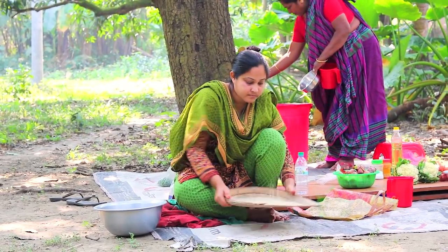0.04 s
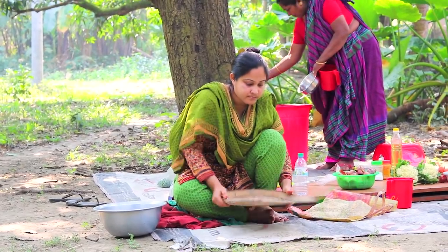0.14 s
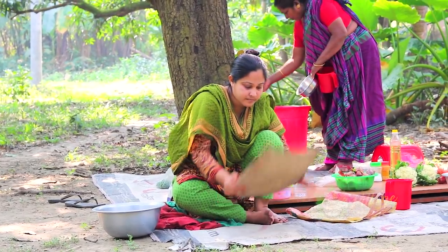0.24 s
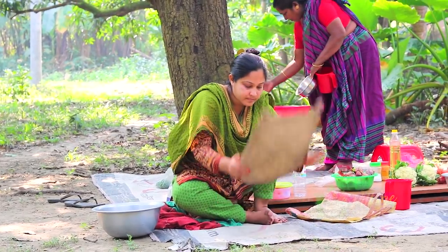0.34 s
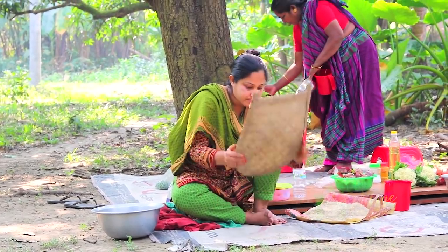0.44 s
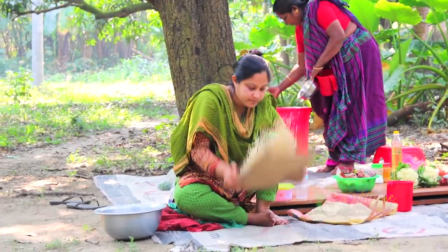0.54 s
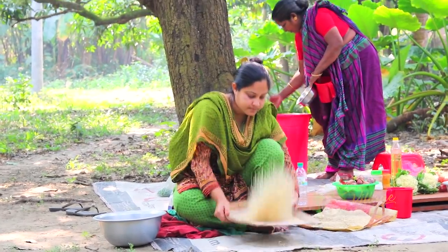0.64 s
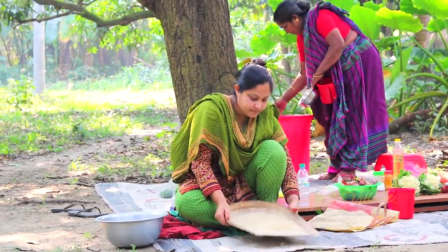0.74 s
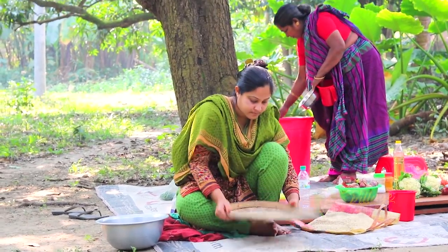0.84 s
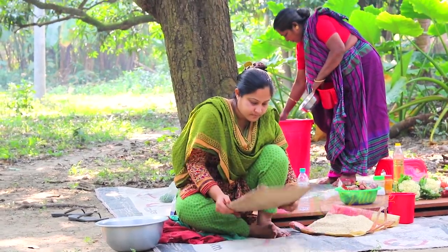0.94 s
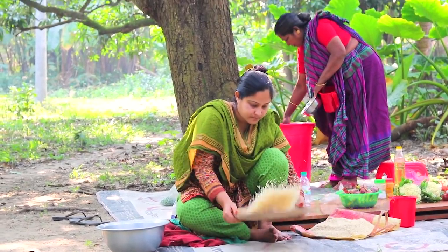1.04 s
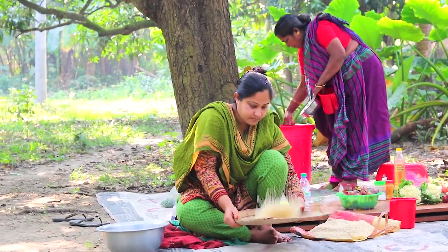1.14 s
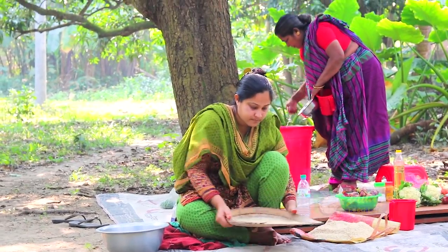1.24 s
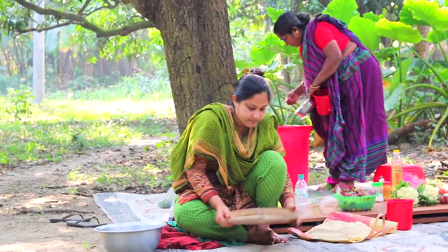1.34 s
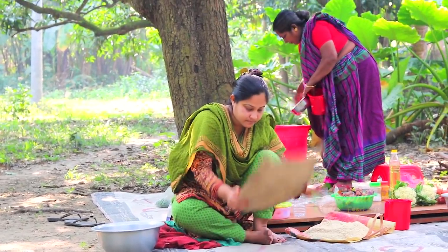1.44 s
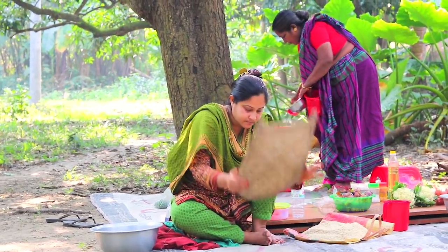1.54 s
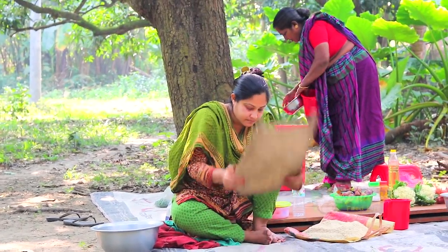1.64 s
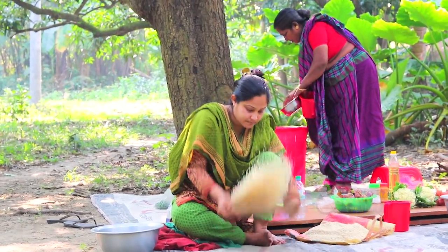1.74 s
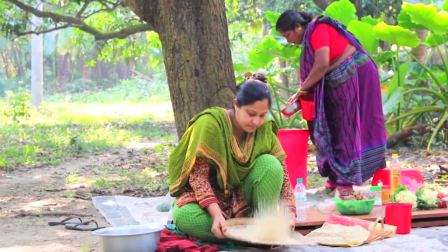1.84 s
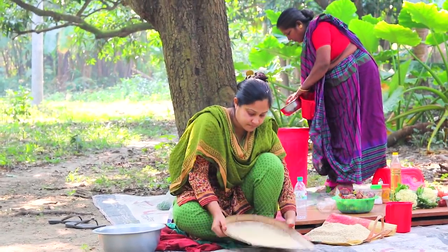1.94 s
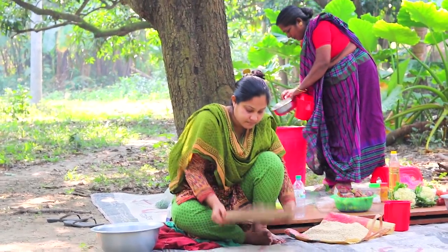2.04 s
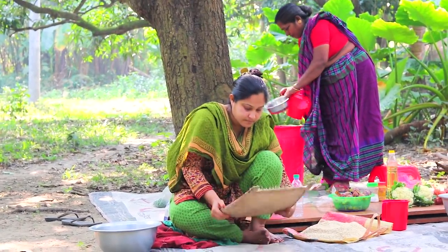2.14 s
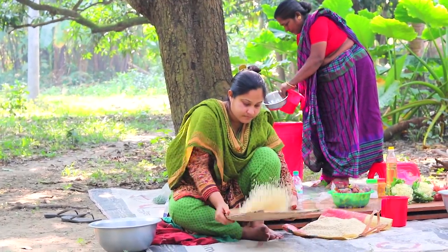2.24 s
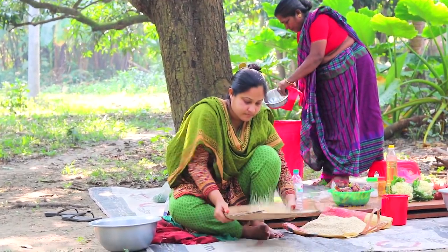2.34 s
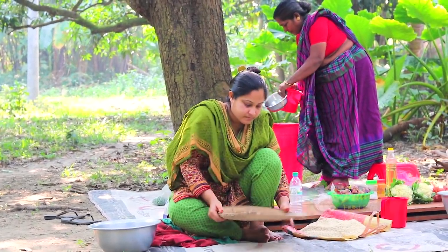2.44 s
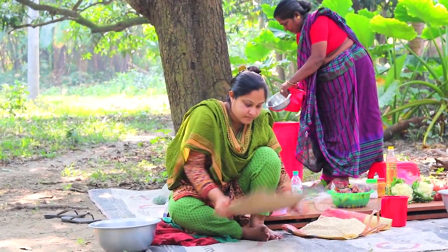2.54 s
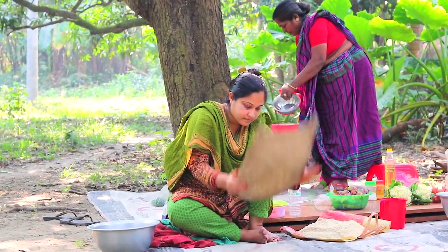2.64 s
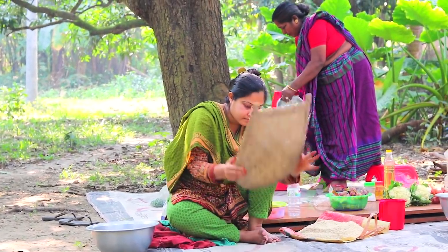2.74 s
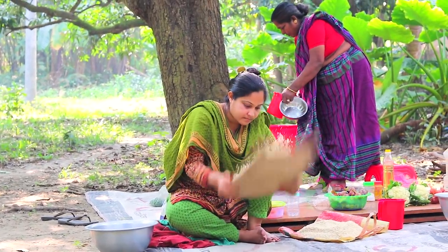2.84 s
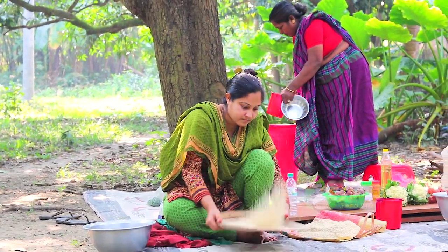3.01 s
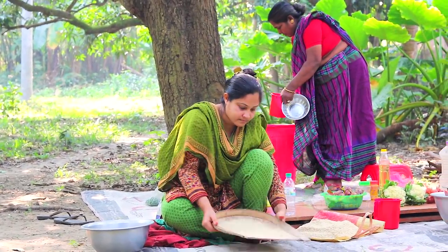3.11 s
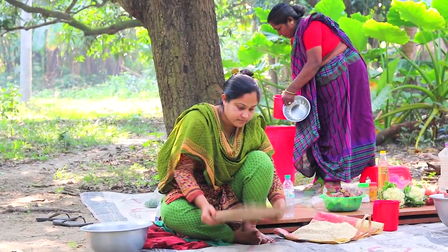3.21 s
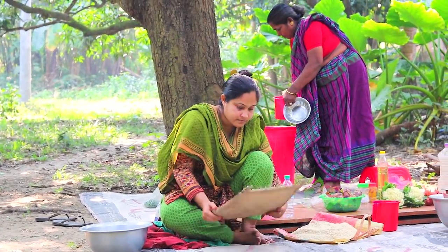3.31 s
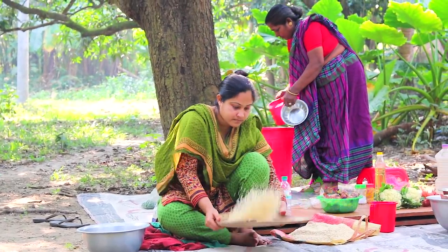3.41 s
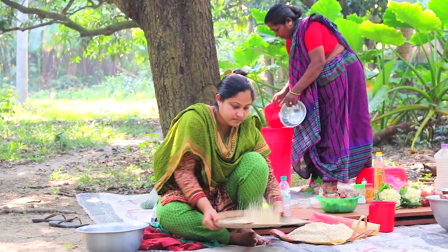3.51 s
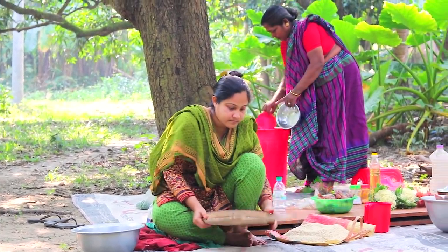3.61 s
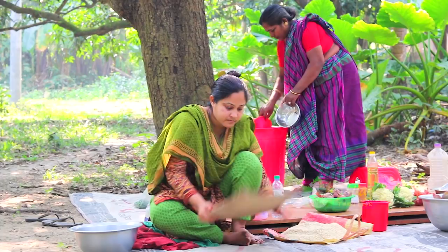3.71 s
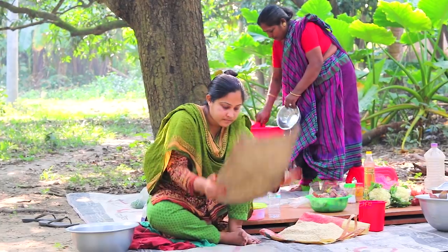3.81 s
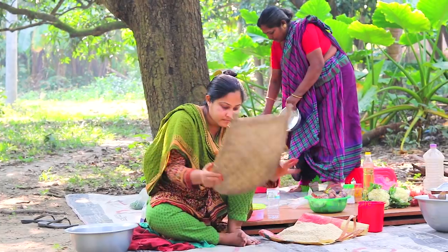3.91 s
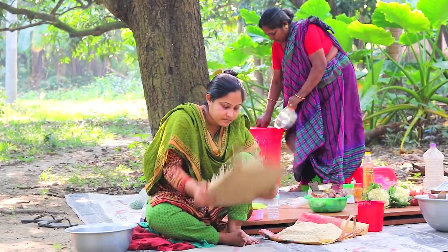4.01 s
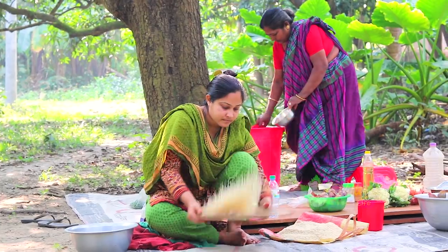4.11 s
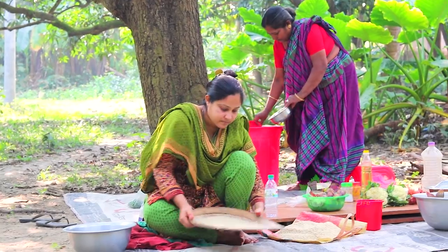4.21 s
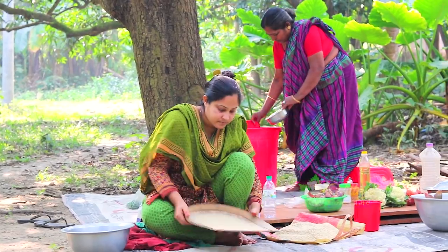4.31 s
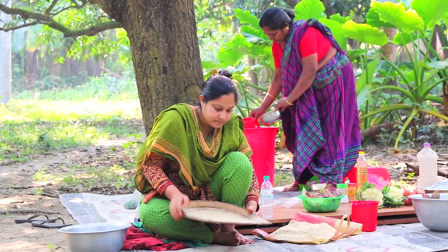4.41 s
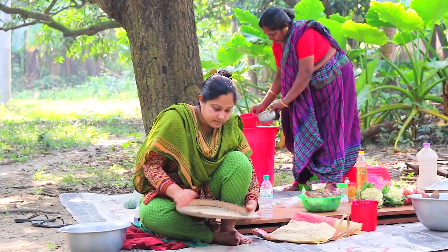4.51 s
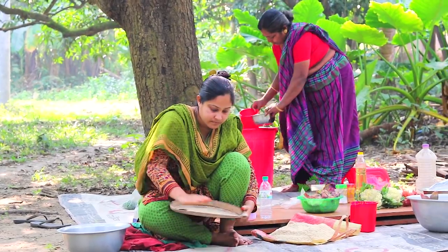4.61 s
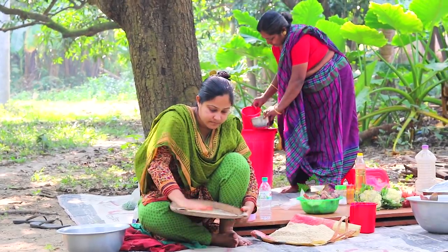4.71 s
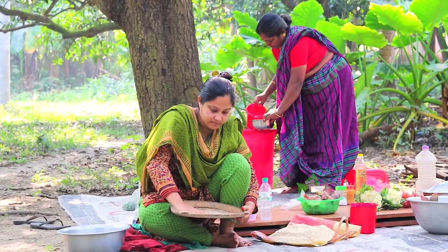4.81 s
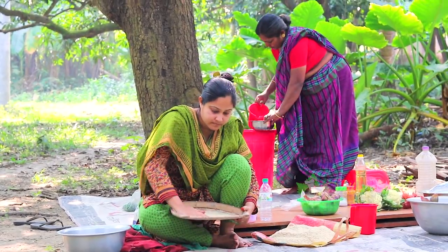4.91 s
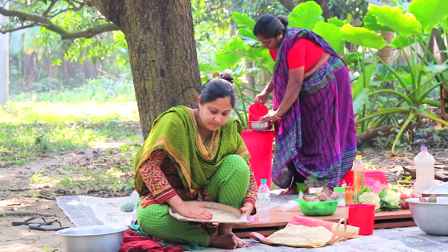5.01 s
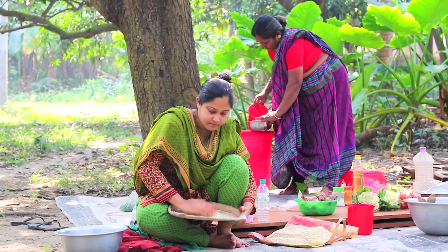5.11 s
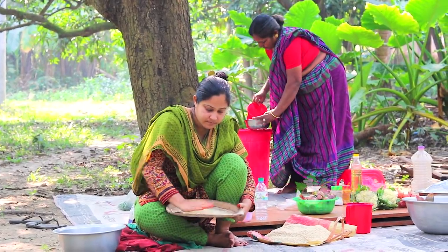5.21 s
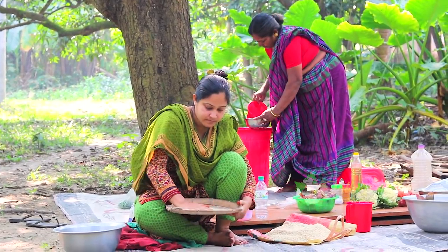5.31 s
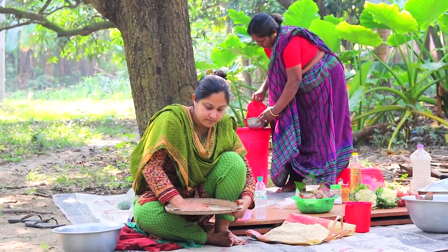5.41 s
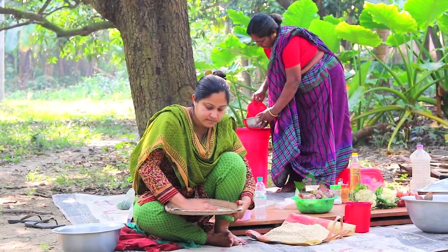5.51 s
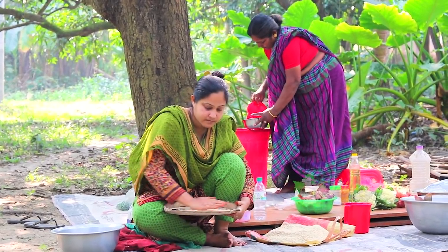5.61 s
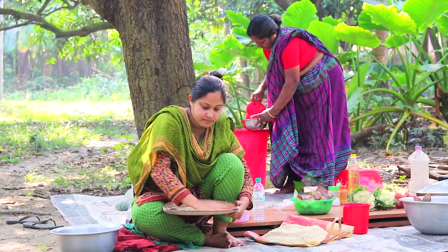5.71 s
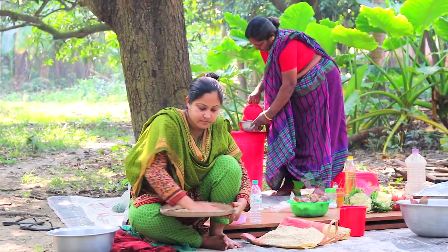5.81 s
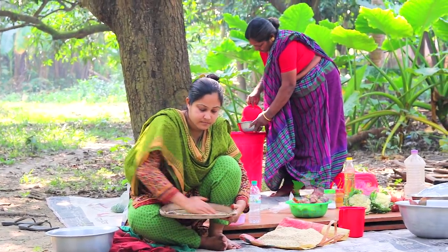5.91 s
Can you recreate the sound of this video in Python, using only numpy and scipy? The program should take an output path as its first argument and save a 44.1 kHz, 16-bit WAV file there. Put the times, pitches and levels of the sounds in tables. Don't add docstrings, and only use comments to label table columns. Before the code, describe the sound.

Grain is tossed and slid on a woven tray in rhythmic hissing strokes, with finger drum-taps, then a light hand-spread and a metal clink outdoors.

```python
import sys
import numpy as np
from scipy import signal
from scipy.fft import rfft, irfft, next_fast_len
from scipy.io import wavfile
from scipy.ndimage import uniform_filter1d

SR = 44100
rng = np.random.default_rng(int(sys.argv[2]) if len(sys.argv) > 2 else 0)


def wav_record(signal):
    frames = np.transpose(np.atleast_2d(signal))
    bounded = np.clip(frames, -1, 1)
    quanta = np.round(bounded * 32767).astype(np.int16)
    wavfile.write(sys.argv[1], SR, quanta)


def convert_level_to_amplitude(level_db):
    exponent = np.asarray(level_db, float) / 20
    return 10 ** exponent


N = 262395

# [pitch_hz, level_db per Hz]
YARD_COLOUR = [(15, -40), (25, -3), (105, -0.5), (285, -3), (451, -7), (516, -9), (796, -12.5), (962, -9),
               (1520, -17.5), (1890, -14.5), (2550, -16), (3430, -14.5), (4030, -16), (6920, -22),
               (16000, -35)]
# [pitch_hz, likeness 0-1]
YARD_LIKENESS = [(60, 0.97), (130, 0.91), (300, 0.87), (700, 0.37), (2000, 0.046), (8000, 0.043),
                 (15000, 0.18)]
# [pitch_hz, level_db, t60_s]
DRONE = [(79.5, -57.5, 0.35), (128, -59, 0.15)]
# [time_s, firings_per_s]
PUMP_SPEED = [(0, 8.074), (.8, 8.171), (2, 8.243), (3.1, 8.017), (4.3, 8.19), (4.6, 8.522), (5.95, 8.584)]
# [time_s, peak_db]
PUMP_REACH = [(0, -37), (.29, -33), (.4, -52), (.65, -42), (.9, -60), (1.14, -51), (1.26, -44), (1.65, -29),
              (2.1, -33.5), (2.4, -29), (3.35, -28.5), (3.85, -30.5), (4.45, -28), (4.7, -32.5),
              (4.93, -28), (5.4, -32), (5.6, -33), (5.95, -31)]
# [pitch_hz, level_db, t60_s]
EXHAUST_MODES = [(211, -4.5, 0.031), (519, -5, 0.11)]
# [start_s, length_s, buzz_db, lower_buzz_db, share of the higher wing tone 0-1]
INSECT_BURSTS = [(.592, .026, -52, -62, .8), (1.613, .02, -53, -60, .9), (1.636, .028, -56, -58, .9),
                 (1.668, .042, -49.5, -55, .15), (1.722, .03, -51, -60, .6), (1.758, .038, -50, -60, .8),
                 (1.8, .022, -52, -58, .6)]
# [pitch_hz, t60_s]
WING_TONES = [
    [(7700, .012)],
    [(8100, .012)],
    [(4200, .004), (4500, .004)],
]
# [start_s, length_s, level_db, pitch_hz]
DOVE_COOS = [(.85, 0.22, -57, 775), (2.712, 0.083, -61, 760), (2.805, 0.075, -54, 752),
             (3.75, 0.15, -55, 777), (4.303, .075, -60, 775), (4.405, 0.22, -59, 776),
             (5.116, 0.3, -55.5, 775), (5.41, 0.29, -59.5, 778)]
# [start_s, level_db, pitch_hz]
BIRD_CHIPS = [(4.488, -58, 4160), (4.524, -55, 4000), (4.561, -54, 4000), (4.632, -63, 4070),
              (4.685, -64, 4000), (4.742, -55, 4100), (5.412, -60, 4100), (5.651, -50, 4010),
              (5.717, -49, 4110)]
# [delay_s, level_db]
ECHOES = [(.011, -40), (.023, -16.5), (.038, -25), (.061, -26)]
# [time_s, level_db]
CUP_HITS = [
    (4.7884, -34.5),
    (4.806, -48),
    (4.848, -50),
    (4.905, -52),
]
# [pitch_hz, level_db, t60_s]
CUP_MODES = [(676, -12, .2), (852, -6, .22), (905, -9, .12), (1082, -11, .15), (1132, -11, .15),
             (2600, -9, .45), (2691, -15, .2), (2877, 4, .2), (3129, -1, .1), (3586, -12, .35),
             (3633, -18, .3), (3926, -10, .3), (3977, -10, .25), (6062, -16, .3)]
# [pitch_hz, level_db, t60_s]
CUP_HUM = (943, -39, 1.1)
# [pitch_hz, width_hz, level_db, t60_s]
CUP_CHATTER = [(402, 170, 3, 0.15), (750, 440, -3, 0.4), (954, 250, -1, 0.34), (1810, 550, 2, .05),
               (2750, 500, -4, 0.39), (3830, 860, -8, 0.42), (7200, 3400, -6, 0.46)]
# [time_s, peak_db, pitch_hz, t60_s]
STRAY_TICKS = [(.49, -35, 6500, .004), (.5574, -28, 5800, .005), (.5695, -30, 4800, .004),
                   (.5722, -22, 3100, .005), (.5725, -22, 870, .015), (.5735, -23, 1900, .006),
                   (.5755, -23, 1400, .007), (.584, -32, 1500, .008), (.586, -35, 3300, .008),
                   (.649, -29, 7550, .002), (.664, -33, 4000, .004), (1.602, -36, 4400, .012),
                   (1.62, -36, 4350, .012), (1.639, -42, 2800, .008), (1.66, -42, 2700, .008),
                   (1.681, -42, 4500, .01), (1.7226, -36, 8900, .007), (1.7226, -38, 6100, .007),
                   (1.734, -38, 3300, .005), (1.7476, -36, 5900, .008), (1.7476, -36, 8900, .008),
                   (1.8275, -36, 9200, .005), (1.8275, -40, 6200, .004), (2.913, -36, 2900, .004),
                   (2.961, -40, 5500, .003), (2.9875, -38, 7000, .002), (2.999, -36, 3800, .006),
                   (3.0175, -32, 5500, .002), (4.0475, -30, 2950, .007), (4.058, -31, 3400, .006),
                   (4.146, -35, 2200, .008),
                   (4.4566, -38, 1550, .014), (4.4568, -40, 2300, .01), (4.464, -39, 1550, .011),
               (4.5975, -43, 3900, .01), (4.6, -38, 6000, .002), (4.7883, -32, 1900, .004),
               (4.7885, -36, 6100, .006), (5.178, -38, 5500, .002), (5.198, -41, 6000, .002),
               (5.2108, -36, 9000, .002), (5.237, -38, 12000, .002), (5.285, -42, 7500, .002),
               (5.345, -42, 6500, .002), (5.377, -44, 5000, .002), (5.4368, -40, 6000, .002),
               (5.527, -44, 3400, .07), (5.545, -37, 3700, .05), (5.555, -40.5, 1900, .13),
               (5.688, -35, 7800, .002), (5.79, -41.5, 2530, .065), (5.792, -36, 11000, .0015),
               (5.806, -35, 8500, .002), (5.81, -38, 5000, .003), (5.8364, -36, 6000, .002),
               (5.93, -38, 410, .11)]
FINGER_TIMES = [.5572, .569, .582, 1.7224, 1.7338, 1.7472, 2.8757, 2.8874, 2.9008, 4.0455, 4.0566, 4.066]
# [boom_db, tray_pitch_hz, nail_tick_db, nail_pitch_hz]
FINGER_TOUCHES = [(-13.5, 460, -25, 2870), (-12, 405, -25, 3300), (-23, 400, -36, 2500),
                  (-16.5, 430, -32, 2830), (-19, 390, -44, 2860), (-16, 370, -29.5, 2910),
                  (-16.5, 460, -26, 2700), (-17.5, 400, -24.5, 2420), (-21, 350, -27.5, 2820),
                  (-15.5, 430, -30.5, 3560), (-14.5, 350, -29, 2700), (-28, 440, -45, 2740)]
# [pitch_hz, level_db, t60_s]
TRAY_MODES = [(168, -16, 0.091), (238, -15, 0.06), (335, -43, 0.015), (394, -24, 0.031), (465, -21, 0.024),
              (740, -16, 0.037), (883, -10, 0.032)]
# [times the nail pitch, level_db, t60_s]
NAIL_MODES = [(.6, 0.5, 0.005), (1.0, 9, 0.0075), (1.3, 2, 0.004), (2.1, 2, 0.007), (3.1, 2, 0.006),
              (4.2, -1, 0.003)]
# [pitch_hz, level_db per Hz]
GRAIN_COLOUR = [(240, -45), (400, -16), (460, -12.5), (626, -16.5), (979, -11), (1230, -15.5), (1580, -9.5),
                (1990, -11), (2320, -7.5), (3200, -5.5), (4800, -7), (5300, -6), (5900, -4.5), (7870, -3.5),
                (10100, -8.5), (11900, -5.5), (16000, -12.5)]
GRAIN_ZONES = [350, 1800, 5500, 10000, 16000]
# [pitch_hz, likeness 0-1]
GRAIN_LIKENESS = [(500, 1), (1400, 0.92), (2700, 0.67), (3400, 0.8), (4700, 0.52), (6000, 0.89),
                  (7400, 0.33), (9000, 1), (10000, 0.26), (11500, 0.79), (14500, .5), (16000, .6)]
# [crest_s, rattle_db, hold_s, brightness_db, weight_db on the tray body]
CATCHES = [
    (.728, -24.5, 0.057, -1.8, -1),
    (1.906, -24, 0.045, -0.7, -2.4),
    (3.077, -22, 0.032, -1.5, -2.5),
    (4.218, -22.5, 0.015, -2.5, -3),
]
SLIDES = [(0.05, -28, 0.075, .6, 0.14), (1.193, -29.5, 0.084, -.6, .1), (2.37, -27.5, 0.062, -0.096, 0.085),
          (3.527, -28.5, 0.076, .2, 0.083)]
RETURNS = [(.238, -31, 0.061, -1.7, 1.6), (1.405, -31.5, 0.044, -0.24, .1), (2.578, -32, 0.045, 0.26, .1),
           (3.728, -32.5, 0.064, 1.3, .1)]
SWEEPS = [(1.79, -59, .03, .1, .1), (2.94, -61, 0.026, 0.049, .1), (4.984, -37, 0.1, -1.2, .1),
          (5.21, -55.5, 0.016, 1.2, .1), (5.514, -41.5, 0.04, 0.25, .1), (5.64, -53.5, 0.022, 1.1, .1),
          (5.889, -39.5, 0.048, 0.37, .1)]
RUSTLES = [(.42, -50, 0.017, -18, 14), (.57, -44, 0.058, -9, 10), (.648, -45.5, 0.0097, -1, 2),
           (1.725, -46, 0.029, -1, -3), (1.826, -51, .005, 4, -7), (1.845, -42, 0.02, -1, -10),
           (2.88, -60, 0.02, 13, .1), (2.987, -47, 0.0075, 5, -9), (3.02, -38, 0.011, -4, -6),
           (0.672, -31, 0.0072, -4, -13), (4.05, -51, 0.034, 5, 15), (4.107, -52, .012, 5, -6),
           (4.121, -44.5, 0.023, 7, -4), (4.149, -34, 0.0087, -1, -1), (4.455, -49, 0.017, -10, 9),
           (4.597, -62, .006, -11, -2), (4.842, -42, 0.01, 4, 5), (5.687, -55, .006, 8, -8),
           (5.768, -58, .006, 0, -3), (5.805, -46.5, 0.004, 3, -5), (5.836, -47, .01, -6, -7)]
# [rise_db_per_s, fall_db_per_s, time the heap takes to follow_s]
PACE = [
    (148, 139.5, 0.018),
    (151, 187, 0.027),
    (195, 153.5, 0.035),
    (175, 186, 0.025),
    (2520, 903, .004),
]
# [body_db, husk_db, finest_db]
SHADE = [(-9, 5, 1.5), (-12, 3, -3), (-9, 1.5, -5), (-6, 1.3, -4), (-9.5, -3, -8)]
# [rattle_db_per_s, body_db_per_s, husk_db_per_s, finest_db_per_s]
TURN = [(-4, -1, -5.5, 15), (8.5, 8, 31, 47), (-1, -15, -21, -3), (7, -20, -13, -7), (2, -4, -5, 0.1)]
# [rattle_db, body_db, husk_db, finest_db]
TRICKLE = (-60.5, -64, -66, -71)
DULLING = (.03, 0.21)
# [first_grains_s, time_to_arrive_s]
LANDINGS = [(.662, 0.017), (1.855, 0.016), (3.026, 0.017), (4.136, 0.018)]
# [start_s, time_to_get_going_s]
SLIPS = [(-.1, .012), (1.065, 0.0081), (2.235, 0.011), (3.385, 0.03)]
SWELL_BEFORE = (0.017, 0.6)
# [pitch_hz, left_minus_right_db]
PORT_LEVELS = [(60, -1), (110, -0.5), (200, -1), (380, 0), (700, -1.5), (1290, 0), (2500, -5), (3700, -2),
               (4500, 4.5), (5700, -3), (6600, 1.5), (8120, -5), (10500, 3), (13000, 0.5), (14300, 1.1),
               (15500, -1.1)]
# [pitch_hz, right port lead in radians]
PORT_LEAD = [(300, .1), (2000, .3), (3500, -.2), (4900, .5), (5800, .1), (7200, .9), (8600, .1),
             (9800, -.1), (11000, .7), (12200, 1), (13200, .7), (14500, 1.4), (16000, 1.1)]


def rms_one(x):
    return x / np.sqrt(np.mean(x ** 2) + 1e-20)


def in_time(rows):
    s, *columns = np.transpose(rows)
    return [np.interp(np.arange(N) / SR, s, column) for column in columns]


def at_hz(points, hz):
    points_hz, values = np.array(points)[:, 0], np.array(points)[:, 1]
    return np.interp(np.log(hz), np.log(points_hz), values)


def drift(rate_hz):
    r = np.exp(-80 * np.pi * rate_hz / SR)
    noise = rng.standard_normal(N // 40 + 2002)
    slow = signal.lfilter([1], [1, -2 * r, r * r], noise)[2000:]
    return np.interp(np.arange(N) / 40, np.arange(len(slow)), rms_one(slow))


def ring(clicks, hz, t60_s):
    r = convert_level_to_amplitude(-60 / (max(t60_s, 1e-3) * SR))
    w = 2 * np.pi * hz / SR
    return signal.lfilter([0, np.sin(w)], [1, -2 * r * np.cos(w), r * r], clicks + 1e-18)


def train(times, levels_db):
    clicks = np.zeros(N)
    clicks[(np.asarray(times) * SR).astype(int)] = convert_level_to_amplitude(levels_db)
    return clicks


def struck(times, levels_db, modes, spread_db):
    luck_db = spread_db * rng.standard_normal((len(times), len(modes)))
    out = 0
    for k, (hz, db, t60_s) in enumerate(modes):
        out = out + (-1) ** k * ring(train(times, levels_db + db + luck_db[:, k]), hz, t60_s)
    return out


def soft(x, contact_s):
    hump = np.diff(np.hanning(max(int(contact_s * SR), 4)))
    return np.convolve(x, 2 * hump / np.abs(hump).sum())[:N]


def dying(times, levels_db, t60_s):
    return signal.lfilter([1], [1, -convert_level_to_amplitude(-60 / (t60_s * SR))], train(times, levels_db) + 1e-18)


def span(start_s, length_s, edge_s):
    t = np.arange(N) / SR - start_s
    return np.clip(np.minimum(t, length_s - t) / edge_s, 0, 1)


def noise_band(low_hz, high_hz):
    band = signal.butter(2, [low_hz, high_hz], "band", fs=SR, output="sos")
    return rms_one(signal.sosfilt(band, rng.standard_normal(N)))


def bank(sources, spectrum, likeness, low_hz, high_hz, patchy_db, per_octave):
    pairs = round(per_octave / 2 * np.log2(high_hz / low_hz))
    edges = np.geomspace(low_hz, high_hz, num=2 * pairs + 1)
    out = 0
    for k, (low, high) in enumerate(zip(edges, edges[1:])):
        band = signal.butter(2, [low, high], "band", fs=SR, output="sos")
        mid, side = signal.sosfilt(band, sources[k % 2])
        hz = np.sqrt(low * high)
        alike = np.clip(at_hz(likeness, hz), 0, 1)
        lean_db = at_hz(PORT_LEVELS, hz) * np.array([[.5], [-.5]])
        gain = convert_level_to_amplitude(at_hz(spectrum, hz) + patchy_db * drift(14.0) + lean_db)
        out = out + gain * (np.sqrt(1 + alike) * mid + np.sqrt(1 - alike) * side * [[1], [-1]])
    return rms_one(out)


def yard():
    air = rng.standard_normal((2, 2, N))
    return convert_level_to_amplitude(-45.5) * bank(air, YARD_COLOUR, YARD_LIKENESS, 29.0, 15300, patchy_db=3.0, per_octave=2.5)


def drone():
    out = 0
    for hz, db, t60_s in DRONE:
        swell = convert_level_to_amplitude(db + 2.0 * drift(0.2))
        out = out + swell * rms_one(ring(rng.standard_normal(N), hz, t60_s))
    return out


def pump():
    turns = np.cumsum(in_time(PUMP_SPEED)[0]) / SR - .306
    at = np.searchsorted(turns, np.arange(int(turns[-1]) + 1))
    uneven_db = 0.3 * rng.standard_normal(len(at))
    db = in_time(PUMP_REACH)[0][at] + uneven_db
    puff = soft(struck(at / SR + .0005, db, EXHAUST_MODES, spread_db=1.5), contact_s=.0045)
    return puff + .3 * np.roll(puff, int(.0093 * SR))


def insect():
    clicks = (rng.random(N) < 900 / SR) * rng.standard_normal(N)
    voices = []
    for group in WING_TONES:
        tone = rms_one(sum(ring(ring(clicks, hz, t60_s), hz, t60_s) for hz, t60_s in group))
        power = uniform_filter1d(tone ** 2, size=200)
        voices.append(rms_one(tone / (power + 1e-12) ** .35))
    under, over, low = voices
    out = 0
    for s, length, db, low_db, share in INSECT_BURSTS:
        buzz = convert_level_to_amplitude(db) * (share ** .5 * over + (1 - share) ** .5 * under)
        out = out + span(s - .002, length + 0.0052, .004) * (buzz + convert_level_to_amplitude(low_db) * low)
    return out


def dove():
    waver = 2 * np.pi * np.cumsum(1 + .016 * drift(20.0)) / SR
    out = np.zeros(N)
    for s, length, db, hz in DOVE_COOS:
        on = slice(int(s * SR), int((s + length) * SR))
        out[on] += span(s, length, 0.013)[on] * convert_level_to_amplitude(db) * np.sin(hz * waver[on])
    return np.sqrt(2) * convert_level_to_amplitude(3.0 * drift(35.0) - 2) * out


def chips():
    out = np.zeros(N)
    t = np.linspace(0, 1, int(0.013 * SR))
    for s, db, hz in BIRD_CHIPS:
        phase = 2 * np.pi * np.cumsum(hz * (1.06 - 0.092 * t)) / SR
        out[int(s * SR):int(s * SR) + len(t)] += convert_level_to_amplitude(db) * np.sin(np.pi * t) * np.sin(phase)
    return out


def echoes(x):
    dull = signal.lfilter([.3], [1, -.7], x)
    sides = []
    for late in (1, 1.13):
        sides.append(sum(convert_level_to_amplitude(db) * np.roll(dull, int(s * late * SR)) for s, db in ECHOES))
    return np.array(sides)


def cup():
    s, db = np.transpose(CUP_HITS)
    chatter = 0
    for hz, width_hz, level_db, t60_s in CUP_CHATTER:
        noise = noise_band(hz - width_hz / 2, hz + width_hz / 2)
        chatter = chatter + dying(s, db + level_db - 5.0, t60_s) * noise
    hum_hz, hum_db, hum_t60_s = CUP_HUM
    hand_on_cup_s = 4.968
    hand = np.clip((hand_on_cup_s - np.arange(N) / SR) / .015, 0, 1)
    hum = hand * convert_level_to_amplitude(2.8 * drift(30.0)) * ring(train(s[:1], hum_db), hum_hz, hum_t60_s)
    return struck(s, db, CUP_MODES, spread_db=0.5) + chatter + hum


def strays():
    return sum(ring(train([s], db), hz, t60_s) for s, db, hz, t60_s in STRAY_TICKS)


def fingers():
    s = np.array(FINGER_TIMES)
    db, hz, tick_db, tick_hz = np.transpose(FINGER_TOUCHES)
    pad_s = s - .0007
    boom = sum(ring(train([t], d + 1.5), f, .0115) for t, d, f in zip(pad_s, db, hz))
    hump = np.hanning(int(.0011 * SR))
    push = np.concatenate([.55 * hump, -hump]) / hump.sum()
    pad = np.convolve(boom + struck(pad_s, db, TRAY_MODES, spread_db=2.0), push)[:N]
    pad = signal.sosfilt(signal.butter(1, 70, "high", fs=SR, output="sos"), pad)
    tick = 0
    for t, d, f in zip(s, tick_db, tick_hz):
        modes = [(ratio * f, level_db, t60_s) for ratio, level_db, t60_s in NAIL_MODES]
        tick = tick + struck([t], d, modes, spread_db=1)
    tick = signal.lfilter([.4], [1, -.6], tick)
    hop = dying(s, db - 14.5, 0.019) * noise_band(660, 4100)
    return pad + tick + hop


def strokes():
    t = np.arange(0, N + 64, 64) / SR
    power = convert_level_to_amplitude(2 * np.array(TRICKLE))[:, None] * np.ones(len(t))
    for kind, rows in enumerate([CATCHES, SLIDES, RETURNS, SWEEPS, RUSTLES]):
        rise, fall, follow_s = PACE[kind]
        shade = np.r_[0, SHADE[kind]]
        for k, (crest, db, hold, bright_db, weight_db) in enumerate(rows):
            swell = rise * np.maximum(crest - t, 0)
            ebb = fall * np.maximum(t - crest - hold, 0)
            level = uniform_filter1d(db - swell - ebb, max(int(follow_s * SR / 64), 1))
            if kind < len(SWELL_BEFORE):
                start, time = (LANDINGS, SLIPS)[kind][k]
                onset = np.interp(t, [start, start + time], [SWELL_BEFORE[kind], 1])
                level = level + 20 * np.log10(onset)
            colour = shade + np.array([0, weight_db, bright_db / 2, bright_db])
            turning = np.outer(TURN[kind], np.clip(t - crest, -.05, .1))
            dulling = np.outer(np.r_[0, 0, DULLING], ebb)
            power = power + convert_level_to_amplitude(2 * (level + colour[:, None] + turning - dulling))
    return [np.interp(np.arange(N) / SR, t, 10 * np.log10(zone)) for zone in power]


def grain():
    rattle_db, body_db, husk_db, finest_db = strokes()
    hits_per_s = 12000 * convert_level_to_amplitude(.35 * (rattle_db + 28.5) + 1.6 * drift(40.0))
    chance = np.clip(hits_per_s / SR, 1e-3, .9)
    sizes = convert_level_to_amplitude(3.1 * np.minimum(rng.exponential(1, (2, N)), 3.4)) * rng.choice([-1, 1], (2, N))
    hits = sizes * (rng.random((2, N)) < chance) / np.sqrt(chance)
    place = hits * rng.standard_normal((2, N))
    sources = np.stack([hits, place], axis=1) + 1e-18
    out = 0
    for k, (zone_db, count) in enumerate([(body_db, 3), (rattle_db, 4), (husk_db, 6), (finest_db, 8)]):
        low_hz, high_hz = GRAIN_ZONES[k:k + 2]
        zone = bank(sources, GRAIN_COLOUR, GRAIN_LIKENESS, low_hz, high_hz, patchy_db=1.0, per_octave=count)
        out = out + convert_level_to_amplitude(zone_db) * zone
    out = signal.sosfilt(signal.butter(4, 340, "high", fs=SR, output="sos"), out)
    return out * convert_level_to_amplitude(0.49 * drift(57.0))


def scene():
    near = fingers() + strays() + cup()
    animals = dove() + insect() + chips()
    points = near * convert_level_to_amplitude([[-.6], [.6]]) + animals * convert_level_to_amplitude([[1.5], [-1.5]]) + pump() + drone()
    return grain() + points + echoes(near + animals) + yard()


def ports(x):
    size = next_fast_len(N + 512)
    hz = np.maximum(np.arange(size // 2 + 1) * SR / size, 1)
    turn = np.exp(.5j * at_hz(PORT_LEAD, hz))
    return irfft(rfft(x, size) * [turn.conj(), turn], size)[:, :N]


def low_pass(x):
    return signal.sosfilt(signal.butter(12, 16820, fs=SR, output="sos"), x)


def record(dry):
    mix = signal.sosfilt(signal.butter(2, 45, "high", fs=SR, output="sos"), ports(dry))
    mix = .75 * np.tanh(mix / .75)
    mix = signal.sosfilt(signal.cheby2(12, 60, 16750, fs=SR, output="sos"), mix)
    mix = signal.sosfilt(signal.ellip(6, .5, 20, 15800, fs=SR, output="sos"), mix)
    return low_pass(mix)


dry = scene()
out = record(dry)
wav_record(out)
```